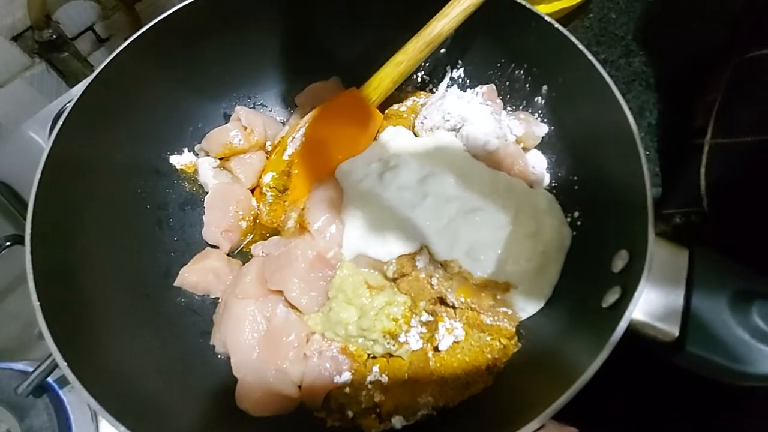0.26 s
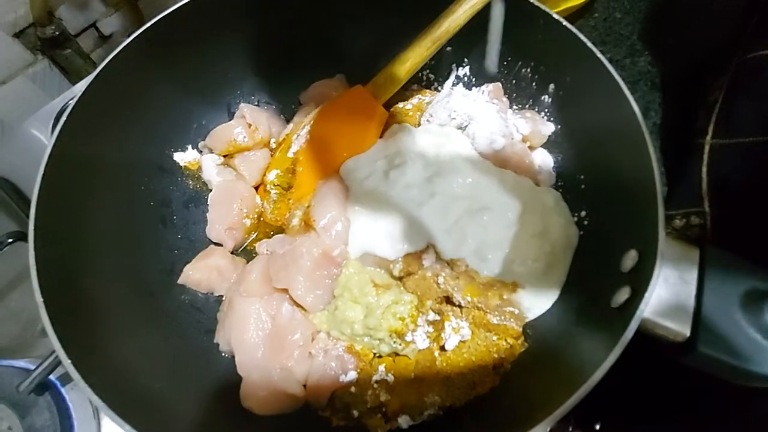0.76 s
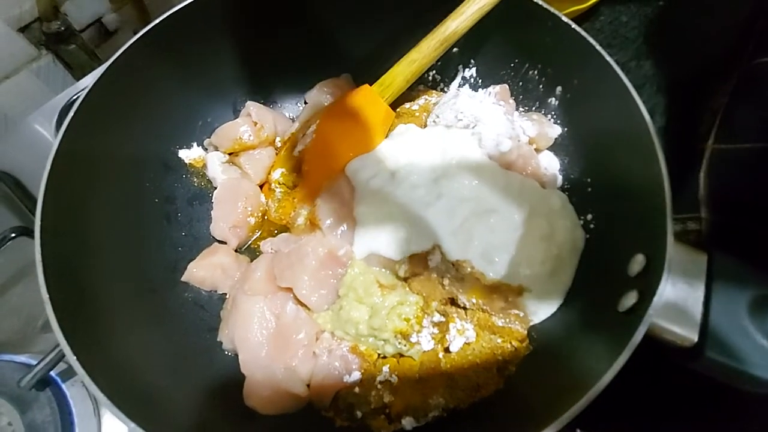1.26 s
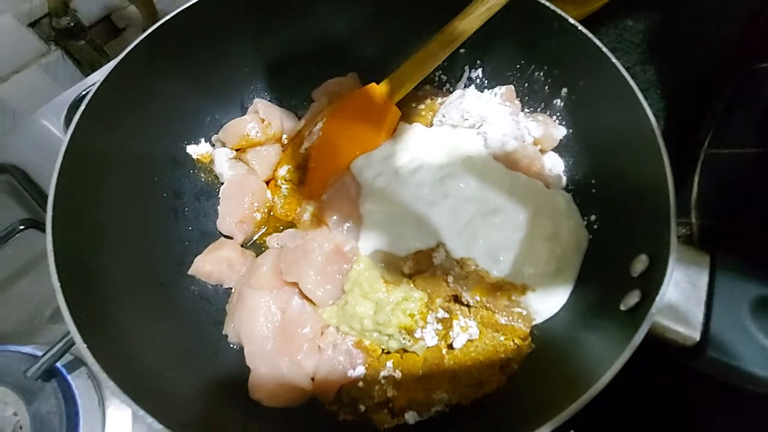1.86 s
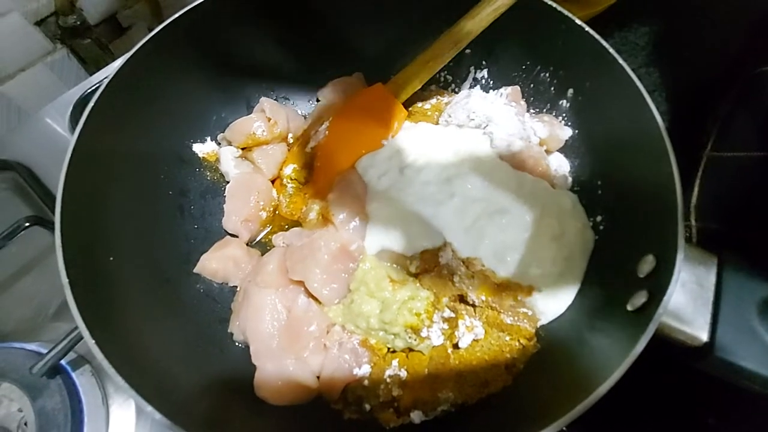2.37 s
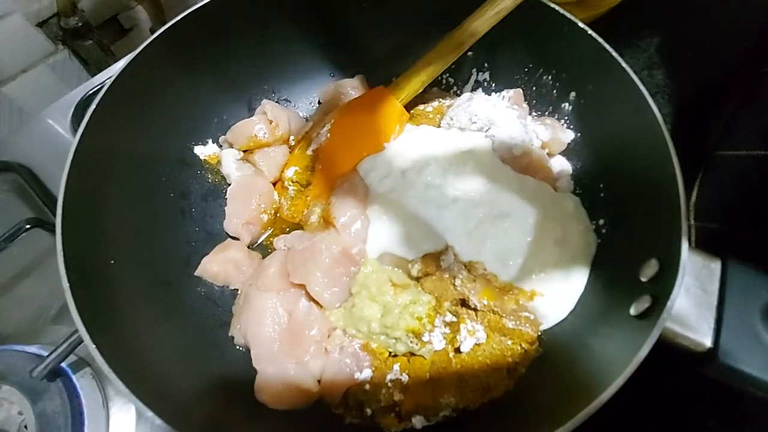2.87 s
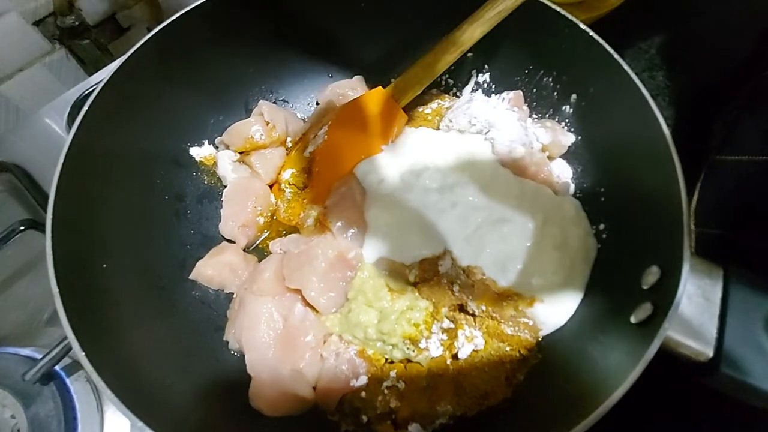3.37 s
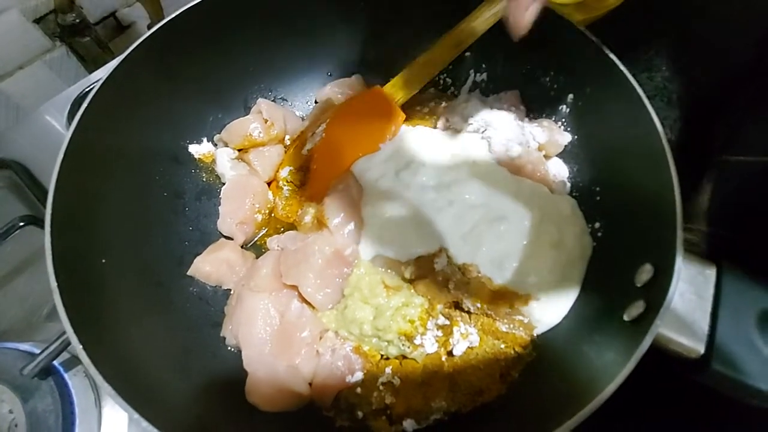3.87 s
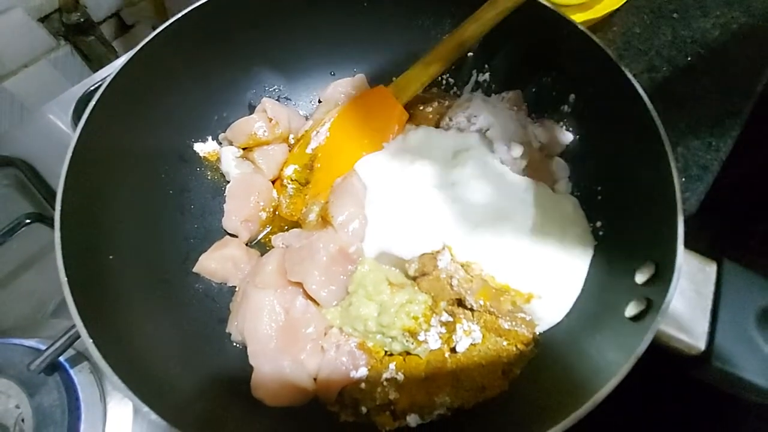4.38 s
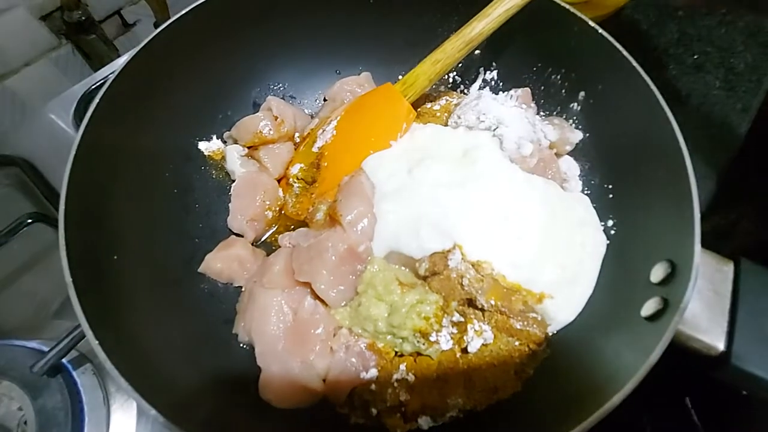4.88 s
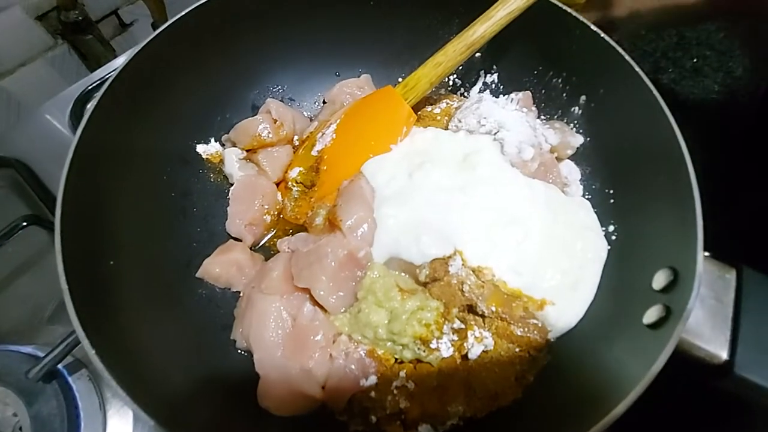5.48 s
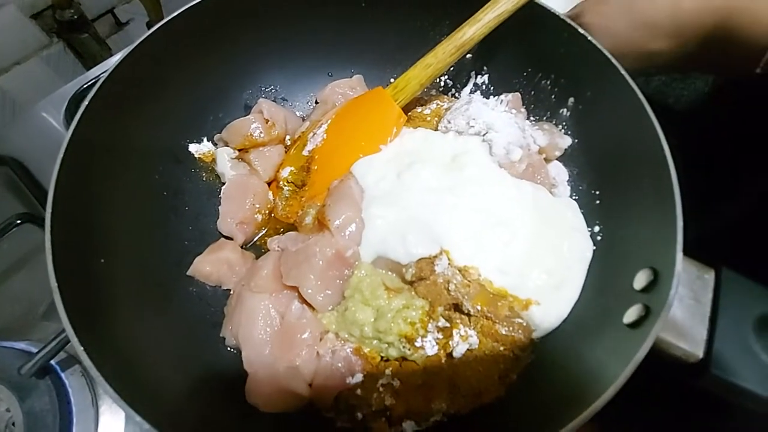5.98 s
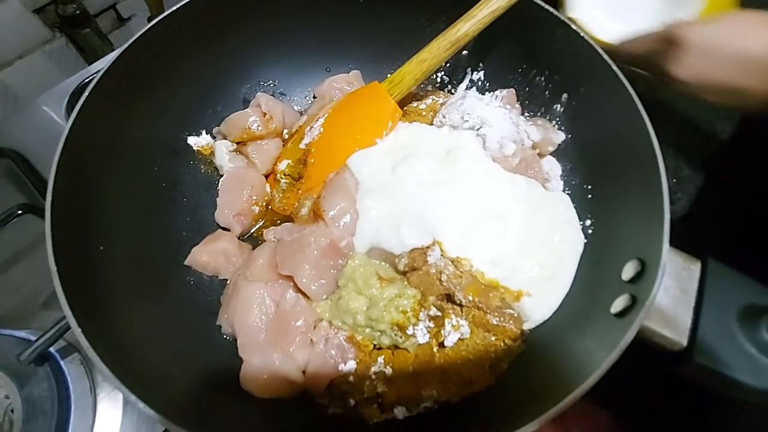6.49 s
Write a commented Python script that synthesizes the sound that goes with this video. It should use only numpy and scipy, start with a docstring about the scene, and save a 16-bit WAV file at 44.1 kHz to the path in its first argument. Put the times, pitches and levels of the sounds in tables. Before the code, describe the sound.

Close handling sounds in a small, hard-walled kitchen. Firm rubbing with squeaky scrapes and soft low bumps opens, then thins to faint friction. Midway a container knocks on the counter with cracks and dull thuds. After a lull, a bowl and utensil clink and clatter in a loud tight cluster, ending with renewed scraping and bumps. Near stereo microphone, quiet floor noise.

```python
"""A small bowl and a utensil clink and clatter in a small, hard-walled kitchen: noise contacts excite resonances.
Earlier a container is knocked on the counter: three main knocks and two lighter touches, each of cracks,
thuds and counter modes. Around it all, before and after, come rubbing (coloured noise under hand strokes),
soft bumps (low modes with puff and tick), short noise bands (gliding squeaks, broad scrapes, a brief tick)
and dry rustle bursts. A diffuse room tail and steady floor noise surround them, in stereo."""
import sys
import numpy as np
from scipy import signal
from scipy.fft import rfft, irfft
from scipy.io import wavfile

SR = 44100
rng = np.random.default_rng(int(sys.argv[2]) if len(sys.argv) > 2 else 0)


def put_to_file(sound):
    """Save the sound as 16-bit audio at rate SR, in the file named by the first command-line argument."""
    columns = np.atleast_2d(sound).T  # one column per channel
    safe = np.clip(columns, -1, 1)
    whole_steps = np.round(safe * 32767)
    wavfile.write(sys.argv[1], SR, whole_steps.astype(np.int16))


N = 297407


def amp(db):
    """Convert dB to an amplitude factor."""
    return 10 ** (np.asarray(db) / 20)


def at_hz(points, hz):
    """Interpolate a table over log frequency."""
    f, value = np.transpose(points)
    return np.interp(np.log(hz), np.log(f), value)


def fade(t60_s, size=SR // 2):
    """Exponential decay from 1; t60 is at least 2 ms."""
    return 1e3 ** (-np.arange(size) / SR / max(t60_s, .002))


def add(track, start_s, sound):
    """Mix a sound in at a time."""
    at = max(round(start_s * SR), 0)
    track[..., at:at + sound.shape[-1]] += sound[..., :N - at]


def through(x, response):
    """Convolve each channel with a response."""
    return signal.fftconvolve(np.atleast_2d(x), np.atleast_2d(response), axes=-1)[:, :x.shape[-1]]


def butter(x, kind, cutoff_hz):
    """Second-order Butterworth filter."""
    return signal.sosfilt(signal.butter(2, cutoff_hz, kind, fs=SR, output="sos"), x)


def causal(spectrum, size=4096):
    """Minimum-phase response of a dB spectrum, by folding its cepstrum."""
    hz = np.maximum(np.arange(size // 2 + 1) * SR / size, 1)
    cepstrum = irfft(np.log(amp(at_hz(spectrum, hz))))
    cepstrum[1:size // 2] *= 2
    cepstrum[size // 2 + 1:] = 0
    return irfft(np.exp(rfft(cepstrum)))


def colour(x, spectrum):
    """Give white sound a spectrum and keep its power."""
    response = causal(spectrum)
    return through(x, response / np.linalg.norm(response))


def noise(size, apart_hz=600):
    """Diffuse stereo noise: alike in the bass, unrelated in the treble."""
    mid, side = rng.standard_normal((2, size))
    side = butter(side, "high", apart_hz)
    return np.array([mid + side, mid - side])


def flicker(per_s, depth_db):
    """Randomly wandering gain."""
    knots = rng.standard_normal(N // 10)
    position = np.arange(N) / SR * per_s
    return amp(depth_db * np.interp(position, np.arange(len(knots)), knots))


def ring(hz, t60_s, spread_hz=1500, build_cycles=0.53):
    """One struck mode: builds up within a cycle; phase differs more between channels at higher pitch."""
    cycles = hz * np.arange(SR) / SR
    phase = rng.uniform(-1, 1, (2, 1)) * min(hz / spread_hz, np.pi / 2)
    build = 1 - np.exp(-(cycles / build_cycles) ** 2)
    return fade(t60_s, size=SR) * build * np.sin(2 * np.pi * cycles + phase)


def contacts(times_s, levels_db, t60s_s, snap, rise_s=0.0024):
    """Each contact is a fast-dying crowd of vibrations, led by a click of strength snap."""
    out = np.zeros((2, N))
    rise = 1 - np.exp(-np.arange(SR // 2) / SR / rise_s)
    for start_s, db, t60_s in zip(times_s, levels_db, t60s_s):
        burst = noise(SR // 2) * rise * fade(t60_s)
        burst[:, 0] += snap
        add(out, start_s, amp(db) * burst)
    return out


def struck(times_s, levels_db, modes, vary_db):
    """Every blow rings all modes of a body, each at a randomly varied strength."""
    out = np.zeros((2, N))
    for hz, mode_db, t60_s in modes:
        blows = np.zeros(N)
        varied_db = levels_db + mode_db + rng.normal(0, vary_db, len(times_s))
        blows[(times_s * SR).astype(int)] = amp(varied_db)
        out += through(blows, ring(hz, t60_s))
    return out


def resonate(x, peaks, boost_db):
    """A damped body lifts its narrow resonances (width clipped to 15-70 Hz); overall level is kept."""
    out = x.copy()
    for hz, width_hz, db in peaks:
        b, a = signal.iirpeak(hz, hz / np.clip(width_hz, 15, 70), fs=SR)
        out += amp(boost_db + db) * signal.lfilter(b, a, x + 1e-18)
    return out * x.std() / out.std()


GRIP_S, LET_GO_T60_S = 0.069, 0.55


def stroke(start_s, end_s):
    """One hand movement takes hold, keeps its pressure and dies away."""
    t = np.arange(N) / SR
    grip = np.clip((t - start_s) / GRIP_S, 0, 1)
    return grip * np.exp(-np.log(1000) * np.maximum(t - end_s, 0) / LET_GO_T60_S)


def strokes(starts_s, ends_s, levels_db):
    """Gain of a series of strokes; overlapping powers add."""
    series = zip(starts_s, ends_s, levels_db)
    return np.sqrt(sum((amp(db) * stroke(start_s, end_s)) ** 2 for start_s, end_s, db in series))


# floor spectrum: (frequency [Hz], relative level [dB])
FLOOR_SPECTRUM = [(18, -34.5), (30, 5.5), (311, 2), (600, -5.5), (780, -7), (1010, -35.5), (1100, -21.5),
                  (2230, -19.5), (2900, -20.5), (3870, -15.5), (4190, -49.5), (6050, -52.5), (11100, -25),
                  (16000, -27.5)]
FLOOR_DB = -70


def floor():
    """Steady coloured noise: the quiet of the kitchen."""
    return amp(FLOOR_DB) * colour(noise(N), FLOOR_SPECTRUM)


# rubbing strokes: (start [s], end [s], pressure [dB], dryness [dB])
RUB_STROKES = [(-.05, .44, 8.5, 8), (.42, .55, 5, -3), (.58, 1.08, 0, -1), (1.14, 1.32, -12, 2),
               (1.61, 1.82, 1.5, -3), (2.15, 2.33, -14, 9), (2.57, 2.92, -16, -2.5), (3.1, 3.65, -8, -4),
               (4.13, 4.74, -10.5, -5.5), (4.88, 5.2, -10.5, -0.5), (5.3, 5.6, -4, 2.5),
               (6.02, 6.3, -2, 1.5), (6.3, 6.48, 4.5, -4)]
# light slides: (start [s], end [s], level [dB])
LIGHT_SLIDES = [(.75, 1.279, -70), (3.081, 3.793, -63)]
# friction spectra: (frequency [Hz], relative level [dB])
RUMBLE_SPECTRUM = [(59, -33), (100, -12), (172, -9), (209, -10.5), (297, -1.5), (408, -10), (472, -2.5),
                   (517, -15.5), (579, -12), (1500, -27.5), (1950, -36.5), (3300, -120)]
SCRAPE_SPECTRUM = [(530, -18.5), (900, -17.5), (1220, -1), (1420, -4), (1670, 4), (2030, 2.5), (3580, 4.5),
                   (4180, 2.5), (4760, -3.5), (7000, -16.5), (9100, -48), (15400, -120)]
RUSTLE_SPECTRUM = [(2940, -35), (5000, -5.5), (8380, -10), (9830, -5.5), (11400, -3), (14900, -9),
                   (16000, -16.5)]
SLIDE_SPECTRUM = [(1000, -58), (2400, -16.5), (2650, -5), (3000, -15.5), (3700, -14), (4150, 3),
                  (4450, -12.5), (5000, -21.5), (8000, -57)]
BASELINE_DB = -19.5   # faint steady friction noise throughout, under the strokes
RUMBLE_FOLLOWS, RUSTLE_FOLLOWS = 0.87, 0.6   # dB per dB of pressure
DRY_RUMBLE_LOSS = .2   # dB per dB of dryness


def rubbing(rumble_db=-60.5, scrape_db=-65, rustle_db=-71.5, sing_db=-75):
    """Friction slips clump under uneven grip; pressure lifts all, dryness the rustle; slides sing smoothly."""
    start, end, pressure, dryness = np.transpose(list(RUB_STROKES) + [(0, N / SR, BASELINE_DB, 0)])
    rumble = rumble_db + RUMBLE_FOLLOWS * pressure - DRY_RUMBLE_LOSS * dryness
    scrape = scrape_db + pressure
    rustle = rustle_db + RUSTLE_FOLLOWS * pressure + dryness
    slide_gain = strokes(*np.transpose(LIGHT_SLIDES))
    rub_gain = strokes(start, end, sing_db + RUSTLE_FOLLOWS * pressure)
    out = colour(noise(N) * np.hypot(slide_gain, rub_gain), SLIDE_SPECTRUM)
    layers = [(rumble, RUMBLE_SPECTRUM), (scrape, SCRAPE_SPECTRUM), (rustle, RUSTLE_SPECTRUM)]
    for db, spectrum in layers:
        slips = flicker(per_s=35, depth_db=2.5) * flicker(per_s=1200, depth_db=2.5)
        out += colour(noise(N) * slips * strokes(start, end, db), spectrum)
    return out


# handling bumps: (time [s], relative level [dB], pitch [Hz])
SOFT_BUMPS = [(.002, -40.5, 458), (.138, -45.5, 253), (.208, -44, 302), (.458, -42, 296),
              (.704, -42.5, 301), (1.107, -35.5, 303), (1.164, -42, 163), (1.2, -42, 71.7),
              (1.645, -42.5, 110), (1.664, -41, 188), (1.694, -37.5, 178), (1.754, -32.5, 185.6),
              (1.77, -40, 121), (2.284, -51.5, 126), (2.613, -51.5, 147), (5.654, -29.5, 318),
              (5.692, -29.5, 321), (6.071, -42.5, 476), (6.183, -37.5, 307), (6.456, -31, 299)]
BUMP_HZ, BUMP_T60_S = 300, .1   # reference bump


def bumps(tone_db=-.5, dull_db=-6, tick_db=-17, dull_t60_s=0.083, tick_t60_s=0.052):
    """Short low note, dull puff, faint tick; a lower bump is softer: longer ring, less puff and tick."""
    times, level, pitch = np.transpose(SOFT_BUMPS)
    softness = np.sqrt(BUMP_HZ / pitch)
    contact = level - 20 * np.log10(softness)
    puffs = contacts(times, contact + dull_db, np.full(len(times), dull_t60_s), snap=8.4)
    ticks = contacts(times, contact + tick_db, np.full(len(times), tick_t60_s), snap=3.5)
    out = colour(puffs, RUMBLE_SPECTRUM)
    for start_s, db, hz, t60_s in zip(times, level, pitch, BUMP_T60_S * softness):
        add(out, start_s, amp(db + tone_db) * ring(hz, t60_s))
    return out + colour(ticks, SCRAPE_SPECTRUM)


# short noise bands, being gliding squeaks, broad scrapes and one brief tick:
# (start [s], end [s], first frequency [Hz], last frequency [Hz], half-width [Hz], level [dB])
SHORT_BANDS = [(0.102, 0.211, 3116, 3634, 547, -48), (.28, 0.352, 2300, 3650, 450, -52.5),
               (0.364, 0.465, 3940, 3514, 600, -50), (0.797, 1.057, 1634, 2594, 200, -59.5),
               (1.851, 1.901, 2000, 1000, 400, -58.5), (4.136, 4.179, 5100, 5200, 900, -62.5),
               (6.262, 6.419, 3630, 2273, 560, -48.5), (6.36, 6.558, 2200, 1695, 800, -50.5)]


def short_bands():
    """Low-passed complex noise on a moving carrier makes a noise band whose centre moves."""
    out = np.zeros((2, N))
    for start_s, end_s, first_hz, last_hz, half_width_hz, db in SHORT_BANDS:
        size = max(int((end_s - start_s) * SR), 256)
        white = rng.standard_normal((2, size)) + 1j * rng.standard_normal((2, size))
        narrow = butter(white, "low", half_width_hz)
        carrier = np.exp(2j * np.pi * np.cumsum(np.geomspace(first_hz, last_hz, size)) / SR)
        band = (narrow * carrier).real / narrow.real.std()
        add(out, start_s, amp(db) * np.hanning(size) ** .5 * band)
    return out


# dry rustle bursts, being longer swishes and one short bright tick: (time [s], level [dB], t60 [s])
RUSTLE_BURSTS = [(1.117, -63.5, 0.11), (2.487, -61, 0.11), (2.577, -65, 0.42), (5.313, -57, 0.047)]


def rustle_bursts():
    """Decaying bursts of noise with the rustle spectrum."""
    times, level, t60 = np.transpose(RUSTLE_BURSTS)
    return colour(contacts(times, level, t60, snap=0), RUSTLE_SPECTRUM)


# single-mode touches: (time [s], level [dB], frequency [Hz], t60 [s])
MODE_TOUCHES = [(3.310, -18.5, 522, 0.073), (3.403, -15.5, 139, .14), (3.421, -11.5, 145, 0.08),
                (3.736, -35.5, 417.8, 0.56), (3.74, -40, 1707, 0.27), (5.222, -20, 4056, .07),
                (5.264, -21, 4143, 0.056), (5.266, -30.5, 4266, 0.16), (5.425, -22, 1320, 0.018),
                (5.428, -31, 1660, .047), (5.636, -31.5, 1260, 0.047), (5.699, -18, 6290, 0.033),
                (5.774, -11.5, 2630, .021), (5.844, -29, 946, 0.026)]


def clinks(lowest_hz=85):
    """Some touches wake one mode above the rest; small bodies radiate no deep bass."""
    out = np.zeros((2, N))
    for start_s, db, hz, t60_s in MODE_TOUCHES:
        add(out, start_s, amp(db) * ring(hz, t60_s))
    return butter(out + 1e-18, "high", lowest_hz)


# three main knocks and two lighter touches of a container on the counter:
# (time [s], relative crack level [dB], relative thud level [dB])
COUNTER_KNOCKS = [(3.317, -18, -23.5), (3.410, -32, -28.5), (3.424, -25, -26.5), (3.697, -49, -34.5),
                  (3.716, -20.5, -24.5)]
# edge-to-base rocking of each one:
# (lag after base lands [s], relative crack level [dB], relative thud level [dB], contact t60 [s])
ROCKING_CONTACTS = [(-.008, -10, -4, 0.094), (0, 0, 0, 0.057), (.017, -8, 0, 0.054)]
# contact spectra: (frequency [Hz], relative level [dB])
CRACK_SPECTRUM = [(60, -58.5), (300, -6.5), (490, 1.5), (637, -8), (750, -4), (990, -11.5), (1150, -7.5),
                  (2040, -4), (2700, -10), (3200, -10), (4200, -18), (5100, -25), (8000, -42), (12000, -47),
                  (16000, -67.5)]
THUD_SPECTRUM = [(25, -63), (60, -13.5), (90, -14), (120, 7.5), (175, -3.5), (220, 4), (270, -3), (360, -7),
                 (700, -42), (3000, -89)]
# container resonances: (frequency [Hz], width before clipping [Hz], relative level [dB])
CONTAINER_PEAKS = [(776, 130, -4), (1125, 58, -1), (1720, 140, -8.5), (1950, 180, -9), (2380, 35, -10),
                   (2440, 29, -14), (2850, 41, 1), (3155, 82, -8), (3634, 57, -5)]
# counter-top modes: (frequency [Hz], relative level [dB], t60 [s])
COUNTER_MODES = [(125, -15.5, 0.1), (174.4, -14, 0.27), (245.7, -21, 0.47)]


def knocks(crack_db=-3, thud_db=-3):
    """The container rocks from edge to base and settles, cracking on the counter, which booms under it."""
    touches = []
    for at_s, crack, thud in COUNTER_KNOCKS:
        for lag_s, more_crack, more_thud, t60_s in ROCKING_CONTACTS:
            touches.append((at_s + lag_s, crack + more_crack, thud + more_thud, t60_s))
    times, crack, thud, t60 = np.transpose(touches)
    cracks = colour(contacts(times, crack + crack_db, t60, snap=1.4, rise_s=0.00064), CRACK_SPECTRUM)
    thuds = colour(contacts(times, thud + thud_db, t60, snap=9.4), THUD_SPECTRUM)
    boom = struck(times, thud, COUNTER_MODES, vary_db=1.5)
    return resonate(cracks, CONTAINER_PEAKS, boost_db=2.5) + thuds + boom


# hard strikes, one bright container edge, then bowl and utensil: (time [s], relative level [dB])
HARD_STRIKES = [(3.711, -34), (5.215, -17.5), (5.283, -28.5), (5.347, -28.5), (5.425, -34), (5.647, -28),
                (5.680, -4), (5.687, -11.5), (5.734, -12.5), (5.755, -11.5), (5.765, -19.5), (5.844, -34),
                (5.962, -24), (6.068, -42.5), (6.17, -44), (6.357, -34.5), (6.446, -37), (6.519, -44.5)]
# strike spectra: (frequency [Hz], relative level [dB])
CLACK_SPECTRUM = [(80, -45), (170, -14.5), (318, 0), (420, -2.5), (820, -5), (1050, -8), (1240, 2),
                  (1480, -2), (1600, -1), (2550, 1), (3250, -1), (4230, -1), (5060, -13.5), (6470, -21.5),
                  (7500, -39), (12000, -65)]
EDGE_SPECTRUM = [(2000, -54.5), (4500, -7), (6500, 5.5), (8000, 1.5), (11000, 6.5), (13500, 2), (16000, -8)]
# bowl resonances: (frequency [Hz], width before clipping [Hz], relative level [dB])
BOWL_PEAKS = [(880, 100, -4.5), (1336, 120, -4), (1604, 12, -2.5), (1704, 14, -7), (1963, 35, 4.5),
              (2470, 300, -4), (3144, 31, -18.5), (3574, 150, 4), (4206, 25, -6)]
REBOUND_ABOVE_DB, REBOUND_S, REBOUND_LOSS_DB = -26.5, .02, 7.5   # a firm strike bounces once
STRIKE_T60_S, GRAZE_S_PER_DB = .023, .0004   # t60 at 0 dB; a lighter strike grazes longer


def clatter(clack_db=-2, edge_db=-21):
    """Hard strikes, firm ones bouncing; each is a resonant clack with a faint bright edge."""
    firm = [(at_s, db) for at_s, db in HARD_STRIKES if db > REBOUND_ABOVE_DB]
    rebounds = [(at_s + REBOUND_S, db - REBOUND_LOSS_DB) for at_s, db in firm]
    times, level = np.transpose(list(HARD_STRIKES) + rebounds)
    t60 = STRIKE_T60_S - GRAZE_S_PER_DB * level
    clacks = colour(contacts(times, level + clack_db, t60, snap=1.4, rise_s=0.0008), CLACK_SPECTRUM)
    edges = colour(contacts(times, level + edge_db, t60, snap=2.9, rise_s=0.0007), EDGE_SPECTRUM)
    return resonate(clacks, BOWL_PEAKS, boost_db=-2.5) + edges


# kitchen decay: (frequency [Hz], t60 [s])
KITCHEN_DECAY = [(100, 0.51), (400, 0.41), (1000, 0.32), (3000, 0.28), (6000, 0.28), (14000, 0.18)]


def kitchen(x, wet_db=-4, first_wall_s=0.0028):
    """Close walls give a dense tail that dies sooner in the treble."""
    tail = 0
    edges_hz = np.geomspace(60, 16000, 9)
    for low_hz, high_hz in zip(edges_hz, edges_hz[1:]):
        band = butter(noise(SR), "band", [low_hz, high_hz])
        tail = tail + band * fade(at_hz(KITCHEN_DECAY, np.sqrt(low_hz * high_hz)), size=SR)
    tail *= 1 - np.exp(-(np.arange(SR) / SR / first_wall_s) ** 2)
    return amp(wet_db) * through(x, tail / np.linalg.norm(tail.mean(0)))


def scene(soft_room_db=-5):
    """Blows and their room, over friction and the quiet of the kitchen."""
    hard = knocks() + clatter()
    soft = clinks() + bumps()
    friction = rubbing() + short_bands() + rustle_bursts()
    room = kitchen(hard + amp(soft_room_db) * soft)
    return hard + soft + friction + room + floor()


# microphone port colour: (frequency [Hz], left minus right level [dB])
PORT_DIFFERENCE = [(250, -2.5), (500, -.5), (770, 5), (1200, 1), (1800, -6.5), (2800, -8), (4300, -8),
                   (6400, 9), (9000, 14), (15000, 9.5)]
CUTOFF_HZ = 15800


def record(dry):
    """Each microphone port has its own colour; peaks are rounded and the top is cut."""
    ports = [causal([(hz, side * db / 2) for hz, db in PORT_DIFFERENCE]) for side in (1, -1)]
    heard = np.tanh(through(dry, np.array(ports)))
    low_pass = signal.ellip(10, .2, 80, CUTOFF_HZ, fs=SR, output="sos")
    return signal.sosfilt(low_pass, heard)


dry = scene()
out = record(dry)
put_to_file(out)
```